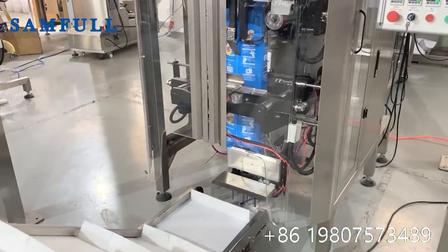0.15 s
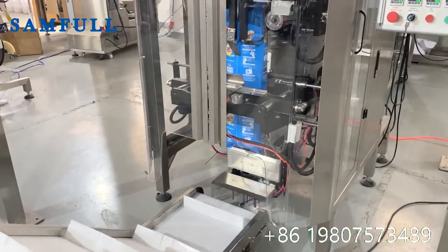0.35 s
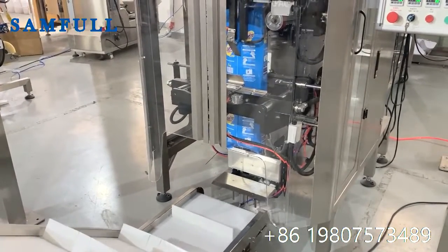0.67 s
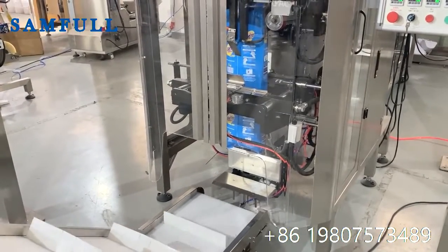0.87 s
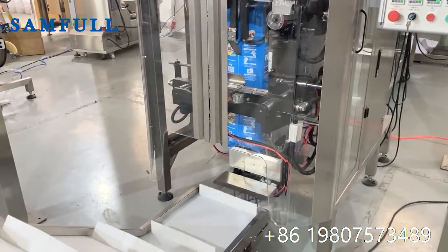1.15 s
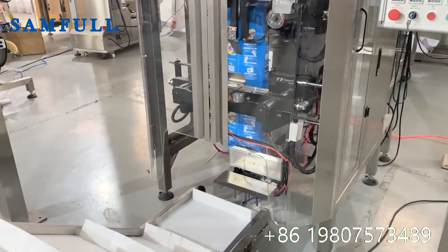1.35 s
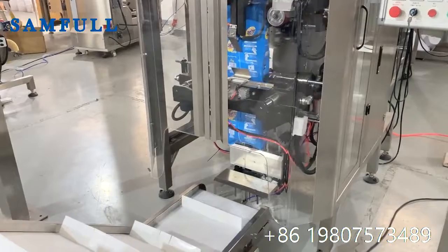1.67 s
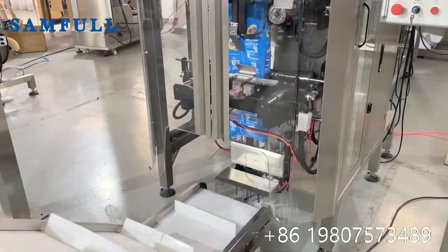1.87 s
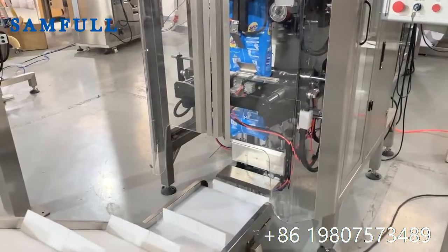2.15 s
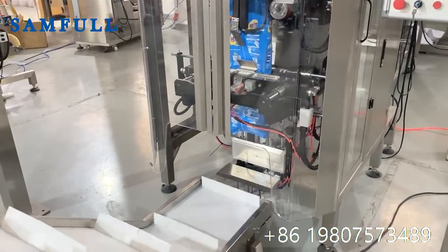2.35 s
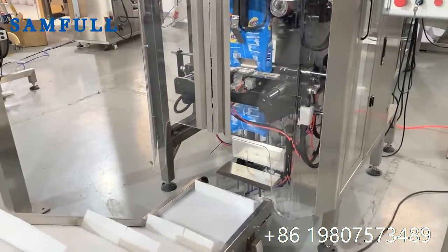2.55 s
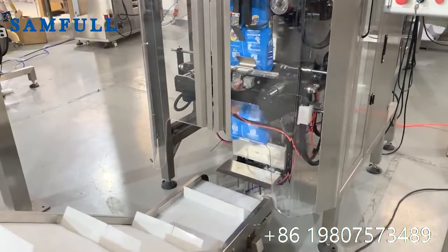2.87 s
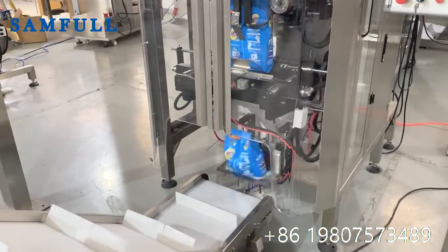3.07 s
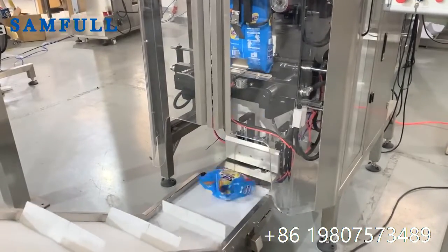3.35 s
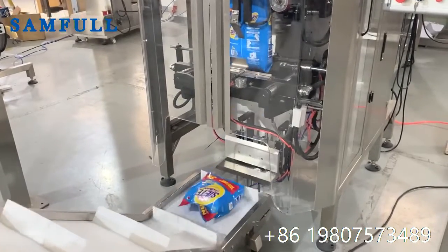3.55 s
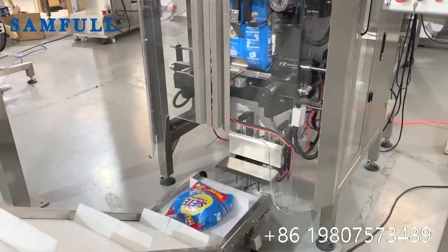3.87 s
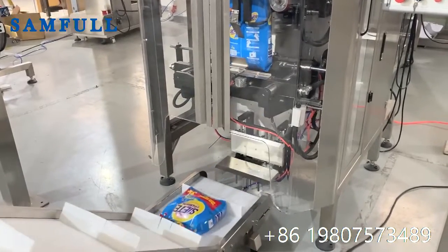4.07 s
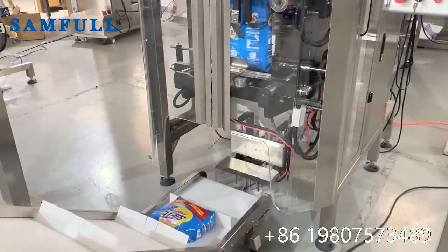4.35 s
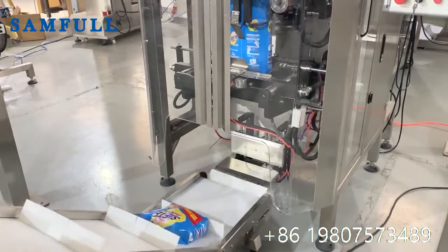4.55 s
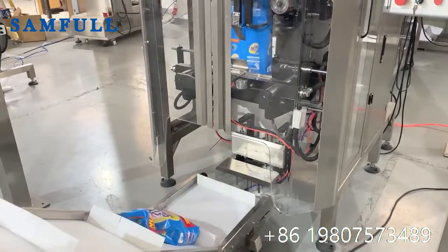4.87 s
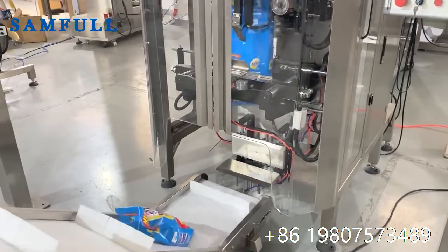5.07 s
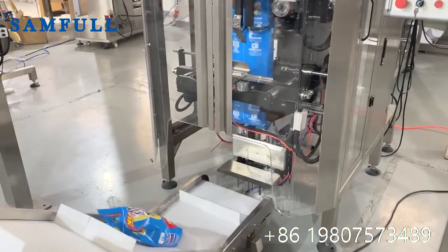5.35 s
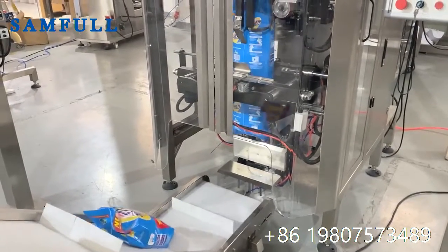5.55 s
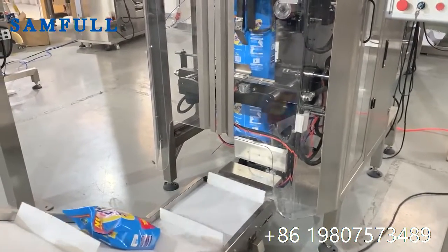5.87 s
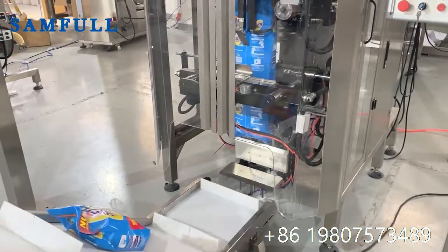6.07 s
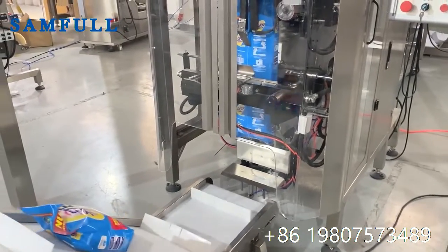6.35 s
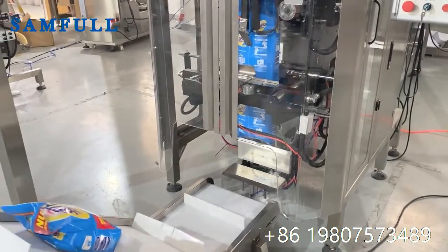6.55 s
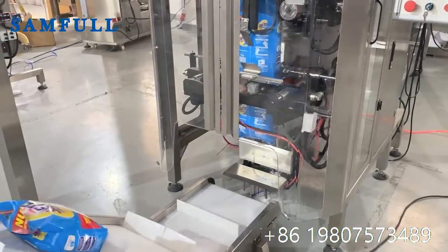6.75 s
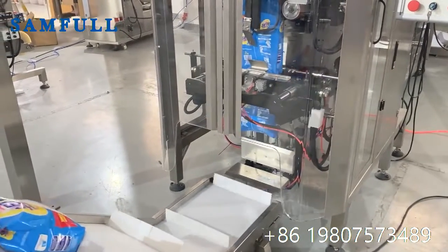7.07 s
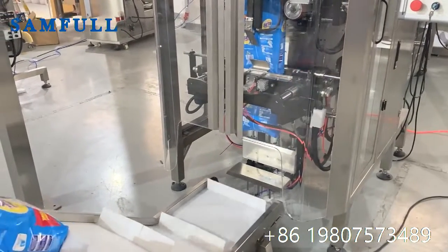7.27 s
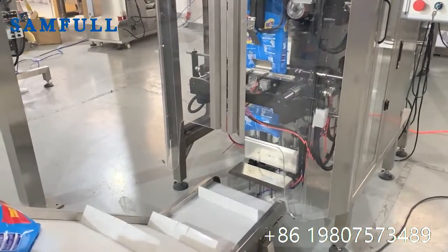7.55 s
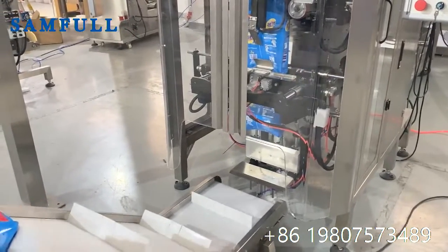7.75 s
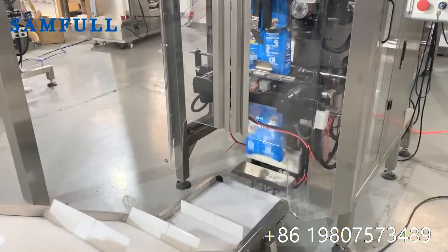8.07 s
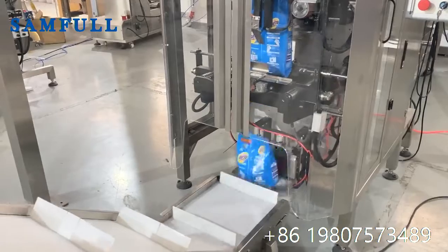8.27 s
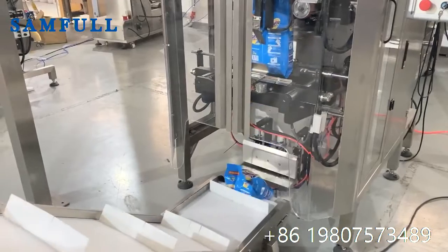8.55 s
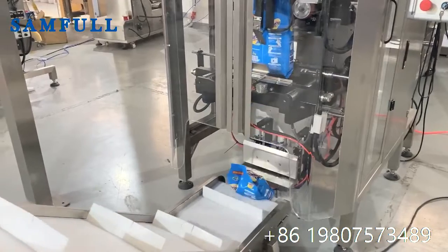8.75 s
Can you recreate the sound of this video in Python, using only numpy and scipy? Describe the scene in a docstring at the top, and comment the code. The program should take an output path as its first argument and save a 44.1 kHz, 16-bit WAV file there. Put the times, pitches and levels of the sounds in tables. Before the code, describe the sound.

A bagging machine cycles over motor hum: long bright air hisses, heavy thumps, sharp metallic clinks, and filled plastic bags slapping down onto a conveyor.

```python
"""A bagging machine works into its second cycle on a hard factory floor, heard by a two-port microphone.
Air cylinders vent and a jet blows: coloured noise, gated by valves. Jaws and bags knock, thump and clink,
and each bag slaps a steel flap and drops onto the conveyor: noise bursts and ringing modes. Film crinkles
in grains of noise. Behind it motors hum and an inverter whines as wavering and steady tones, over churning
drives and hall noise."""
import sys
import numpy as np
from scipy import signal
from scipy.fft import rfft, irfft
from scipy.io import wavfile

SR = 44100
rng = np.random.default_rng(int(sys.argv[2]) if len(sys.argv) > 2 else 0)


def unload_wav(signal):
    """Save mono or channel-first audio to the path in sys.argv[1] as 16-bit WAV at rate SR, clipped to [-1, 1]."""
    wavfile.write(
        sys.argv[1],
        SR,
        np.round(np.clip(np.atleast_2d(signal).T, -1, 1) * 32767).astype(np.int16),
    )


N = 393372
T = np.arange(N) / SR
HZ = np.fft.rfftfreq(N, 1 / SR)

# Levels are nominal: random flutter rides on many of them. Spectra set colour only, so theirs are relative.
# the machine repeats the same strokes for every bag; delays count from the start of a cycle
FIRST_CYCLE_S, CYCLE_S = 1.5, 5.1395

# cylinder strokes of a cycle [delay/s, length/s, level/dB, sag/(dB/s); a negative sag swells]
STROKES = [(0.026, 0.33, -29.5, 3), (0.526, 0.14, -37, 3), (1.215, .1, -32.5, -10), (1.349, 0.92, -27.5, 6)]
VALVE_OPEN_S, VENT_T60_S = 0.03, 1
# colour of the cylinder exhaust [f/Hz, relative level/dB per Hz]
VENT = [(400, 6), (900, 5.5), (1800, 3), (2350, 4), (2850, 3.5), (3300, -0.5), (4200, 1.5), (5050, 7.5),
        (6400, -2.5), (7300, 4), (9000, -10), (10900, 0), (12300, -6.5), (15000, -11)]
# the jet blows once a cycle and grows slightly; after it shuts, the hall rings on
JET_DELAY_S, JET_LENGTH_S, JET_DB, JET_GROWTH_DB_PER_S = 1.337, 0.98, -27, 3.5
JET_OPEN_S, JET_T60_S = 0.023, 0.3
# colour of the jet: a broad rush, humped by nozzle and surroundings [f/Hz, relative level/dB per Hz]
JET = [(700, -22), (2100, -7), (2700, -9), (3450, -2.5), (3900, -5.5), (4500, 2.5), (4780, 0), (5950, 2.5),
       (6300, -3), (7000, 0), (7750, -7), (8550, 0), (9150, -7), (10250, -.5), (10800, -5), (11600, .5),
       (12200, -2), (12800, 2.5), (13300, -1.5), (13800, -.5), (14700, -7), (15600, -6)]

# jaws, linkage and dropping or sliding bags knocking on frame and chute [t/s, level/dB, ring t60/s]
KNOCKS = [(1.856, -32, 0.16), (1.936, -22.5, 0.14), (2.06, -23, .15), (2.085, -27, 0.25),
          (2.138, -30, 0.22), (2.182, -26, 0.18), (2.85, -26.5, 0.37), (3.067, -25, 0.2), (3.102, -26, 0.3),
          (3.18, -22, 0.3), (3.212, -26, 0.19), (3.342, -23, 0.18), (5.5, -35, 0.6), (6.997, -25, 0.18),
          (7.072, -23.5, 0.14), (7.211, -23, 0.17), (7.278, -28, 0.41), (7.99, -25, 0.15),
          (8.322, -21, 0.52), (8.5, -27, .3)]
KNOCK_RISE_S = 0.013
# resonances of the steel frame and chute [f/Hz, width/Hz, relative level/dB]
FRAME = [(450, 140, 7), (805, 240, 4), (1120, 210, -3), (1430, 420, 1.5), (2160, 420, -5),
         (3750, 1800, -17), (5840, 850, -15)]
# moving jaws rocking the whole machine in each cycle [delay/s, level/dB, build-up/s]
THUMPS = [(.087, -17, 0.016), (0.436, -20.5, 0.026), (.572, -21, 0.0097), (.645, -22.5, .02),
          (1.64, -18, 0.021), (1.684, -20.5, .028), (1.84, -20, 0.014), (3.994, -28, .018)]
# jaw carriage moves of a cycle, rattling the frame and loading the drives [delay/s, length/s]
TRAVELS = [(0.133, 0.42), (0.552, 0.274)]
TRAVEL_RATTLE_DB, TRAVEL_CHURN_DB = -34, -32
# bags landing on the conveyor [t/s, clatter level/dB, dull body level/dB]
LANDINGS = [(3.44, -28, -35), (8.689, -17, -20.5)]
LANDING_RISE_S, LANDING_T60_S, BODY_T60_S = 0.024, 0.16, 0.36
# heavy jaw bars clunking dully as they start and stop [t/s, level/dB]
CLUNKS = [(2.08, -27), (7.075, -23), (7.212, -21.5)]

# the falling bag slapping the sheet-steel drop flap [t/s, level/dB]
SLAPS = [(3.159, -22), (3.176, -23.5), (8.299, -21.5), (8.318, -21), (8.338, -25)]
# modes of the flap [f/Hz, relative level/dB, t60/s]
FLAP = [(888, -10, .16), (1087, 0, .2), (1172, -1.5, .18), (1324, -10, .16), (1480, -8, .16),
        (2450, -12, .22), (2670, -14, .14)]
# the chute squeaking and ringing as the bag slides off and lands [t/s, f/Hz, level/dB]
CHUTE = [(3.104, 2290, -31), (3.44, 446, -25), (8.206, 2100, -34), (8.258, 2073, -29), (8.69, 525, -26.5)]
# metal stops meeting [t/s, contact level/dB, ringing level/dB]
CLINKS = [(1.971, -22.5, -40), (2.1662, -12, -16.5), (4.178, -32, -42), (7.1757, -29, -34),
          (7.219, -31, -38), (7.306, -12.5, -16.5)]
# resonances of the stops [f/Hz, width/Hz, relative level/dB]
STOP = [(6000, 260, 6), (6600, 240, 4), (7900, 300, 0), (10600, 600, -6.5), (11500, 800, -6)]
# colour of the hard contact [f/Hz, relative level/dB per Hz]
TICK = [(3000, -16), (4800, -6), (6300, -1), (9000, -15), (10800, 11), (12500, -23), (15000, 0)]

# film sliding over the forming collar, above a faint constant rustle [start t/s, end t/s, level/dB]
PULLS = [(.55, 1.345, -49), (4.22, 6.652, -46)]
RUSTLE_DB, PULL_RAMP_S = -48.5, 0.073
# film catching and slipping in even, fading runs [start t/s, end t/s, first slip level/dB, gap/s]
SLIP_RUNS = [(0.62, .93, -48, .056), (5.482, 5.93, -36.5, 0.071)]
SLIP_FADE_DB_PER_S, CREASE_T60_S = 26, 0.35
# single loud creases of the film and of falling bags [t/s, level/dB]
CREASES = [(1.01, -36.5), (2.58, -37), (3.07, -25.5), (3.175, -21.5), (4.17, -42), (4.28, -42),
           (4.89, -36.5), (5.3, -39), (6.25, -37.5), (7.69, -37), (8.32, -20.5), (8.688, -20)]
# tiny crackles between the louder creases; the level is that of the smallest
CRACKLES_PER_S, CRACKLE_DB, CRACKLE_T60_S = 10, -47.5, 0.042
# colour of the rustling film [f/Hz, relative level/dB per Hz]
FILM = [(500, -1), (2000, 9), (4800, 13), (7000, 8), (11000, 5), (15000, 2)]

# inverter carrier and its sidebands [f/Hz, level/dB]
WHINE = [(7842, -59.5), (7960, -51), (7990, -59), (8020, -48), (8080, -61)]
# servo moves [start t/s, end t/s, f/Hz, level/dB]
SERVOS = [(2.62, 2.86, 300, -23.5), (2.9, 3.06, 302, -23.5), (4.64, 4.92, 300, -22.7),
          (4.95, 5.13, 300, -26.5), (4.62, 4.92, 150, -28), (5.0, 5.56, 69, -24.5), (5.52, 6.0, 68, -28.5)]
# mains hum [t/s, level/dB]
HUM_50 = [(0.0, -29), (0.7, -44), (1.5, -46), (1.87, -32), (4.81, -31.5), (8.6, -30.5)]
# octave of the mains hum [t/s, level/dB]
HUM_100 = [(0.1, -23.5), (0.7, -25.5), (1.7, -29.5), (2.15, -23.5), (2.6, -32), (3.1, -38), (3.55, -32),
           (3.9, -44), (4.7, -32.5), (5.4, -29), (5.8, -47), (6.1, -27.5), (6.5, -34), (7.7, -34),
           (8.15, -25.5), (8.9, -37)]
# steady overtones of the motors [f/Hz, level/dB]
OVERTONES = [(150, -36), (249.7, -36.8), (300, -40), (731, -57)]

# surges of the drives, about one a second, building quickly and easing off slowly [t/s, level/dB]
SURGES = [(.64, -24.5), (1.6, -26), (2.55, -27), (3.48, -27.5), (4.5, -27), (4.92, -26), (5.46, -24),
          (6.35, -24), (6.8, -27.5), (7.36, -27), (8.2, -26)]
CHURN_DB, SURGE_RISE_S, SURGE_T60_S = -36, 0.2, 2.6
# colour of the churning drives [f/Hz, relative level/dB per Hz]
DRIVES = [(30, -41), (140, -3.0), (260, -0.5), (400, -1.5), (650, -11.5), (1200, -16.5),
          (3000, -32.0), (9000, -55)]
# colour of the running noise of machine and hall [f/Hz, relative level/dB per Hz]
HALL = [(25, -27), (38, -10), (65, 2.5), (125, -1.5), (200, -2.5), (380, -4.5), (680, -15.5), (920, -13),
        (1100, -16), (1750, -19.5), (2600, -26.5), (4800, -26), (7000, -34), (10500, -48), (15000, -50)]

# likeness of the sound at the two microphone ports [f/Hz, likeness 0-1]
PORT_LIKENESS = [(60, .99), (200, .93), (400, .82), (750, .38), (2500, .33), (4500, .3), (6300, .6),
                 (7800, .55), (8600, .9), (9200, .99), (10600, .55), (12200, .96), (13700, .65),
                 (15000, .98)]
# how late the shared sound reaches the left port [f/Hz, lag/ms]
PORT_LAG = [(1000, .045), (3500, .06), (4700, .09), (5500, .125), (6300, .163)]
# balance of the ports [f/Hz, left minus right level/dB]
PORT_BALANCE = [(330, .9), (520, -1.2), (1100, -1.1), (2200, -.3), (8000, .1)]
EDGE_HZ = 15750


def pneumatics():
    """Cylinders vent through a silencer; the bare jet is a broad rush of shifting colour."""
    strokes = [amp(db) * valve(delay, length, VALVE_OPEN_S, -sag, VENT_T60_S)
               for delay, length, db, sag in STROKES]
    exhaust = each_cycle(together(strokes))
    blast = valve(JET_DELAY_S, JET_LENGTH_S, JET_OPEN_S, JET_GROWTH_DB_PER_S, JET_T60_S)
    blast = each_cycle(amp(JET_DB) * blast)
    vent = wandering(air(amp(read(VENT))), depth_db=2.5) * exhaust * amp(1.0 * drift(20))
    jet = wandering(air(amp(read(JET))), depth_db=2.5) * blast * amp(.5 * drift(35))
    return vent + jet


def valve(start, length, opening, slope_db, t60):
    """Air flow: the valve opens, the level slopes while it is held, and the hiss dies away after it shuts."""
    held = np.clip(T - start, 0, length)
    opened = np.clip((T - start) / opening, 0, 1)
    dying = np.exp(-np.log(1000) * np.maximum(T - start - length, 0) / t60)
    return opened * amp(slope_db * held) * dying


def knocks(thump_hz=67, thump_t60=0.15, chatter_db=2.0):
    """Jaws, linkage, carriage and bags excite frame and chute with chattering noise; heavy moves thump low."""
    blows = [amp(db) * blow(s, KNOCK_RISE_S, t60) for s, db, t60 in KNOCKS]
    bags = [amp(db) * blow(s, LANDING_RISE_S, LANDING_T60_S) for s, db, _ in LANDINGS]
    clatter = together([amp(TRAVEL_RATTLE_DB) * travel()] + blows + bags)
    chatter = evened(amp(chatter_db * drift(95)))
    frame = wandering(air(resonances(FRAME)), depth_db=2.5)
    thump = sum(amp(db) * blow(s, rise, thump_t60) * np.sqrt(2) * np.sin(2 * np.pi * thump_hz * (T - s))
                for s, db, rise in THUMPS)
    return frame * clatter * chatter + each_cycle(thump)


def travel(ramp=0.056):
    """On while the jaw carriage moves."""
    return each_cycle(sum(during(delay, delay + length, ramp) for delay, length in TRAVELS))


def struck(hits, modes, rise=0.003, uneven_db=1.5, detune=0.0095):
    """Each hit lands on another spot of a steel part and rings its modes in a new mix."""
    out, t = np.zeros((2, N)), T[:SR // 2]
    for s, db in hits:
        at = round(s * SR)
        for hz, mode_db, t60 in modes:
            strength, shift, phase, port = rng.standard_normal(4)
            turns = hz * (1 + detune * shift) * t + phase
            # opposite phase shifts spread the mode over the two ports
            wave = np.sin(2 * np.pi * turns + port * np.array([[1], [-1]]))
            gain = amp(db + mode_db + uneven_db * strength)
            ring = np.minimum(t / rise, 1) * np.exp(-np.log(1000) * t / t60)
            out[:, at:at + len(t)] += gain * ring * wave
    return out


def chute(rise=0.016, t60=0.27, spread=0.12):
    """The thin plate rings on one mode, roughened by the sliding bag."""
    return sum(amp(db) * blow(s, rise, t60) * tone(hz, waver=1.0, rate=spread * hz) for s, hz, db in CHUTE)


def clinks():
    """A hard, dry contact; the stop rings briefly and the panels scatter it."""
    contact = sum(amp(db) * blow(s, .0006, .007) for s, db, _ in CLINKS)
    ring = 0
    for s, _, db in CLINKS:
        direct = blow(s + 0.0012, 0.00032, 0.02)
        scattered = amp(-11.5) * blow(s + 0.0079, 0.00088, 0.15)
        ring = ring + amp(db) * (direct + scattered)
    return air(amp(read(TICK))) * contact + air(resonances(STOP)) * ring


def film(grain_db=1.5):
    """Plastic film rustles in clumped grains as it is pulled, with runs of slips and louder creases."""
    pulls = [amp(db) * during(start, end, PULL_RAMP_S) for start, end, db in PULLS]
    slide = together([amp(RUSTLE_DB)] + pulls) * amp(3.5 * drift(21))
    slips = [(s, db - SLIP_FADE_DB_PER_S * (s - start))
             for start, end, db, gap in SLIP_RUNS for s in np.arange(start, end, gap)]
    creases = sum(amp(db) * blow(s, 0.0099, CREASE_T60_S) for s, db in CREASES + slips)
    grains = evened(amp(grain_db * drift(350)))
    return air(amp(read(FILM))) * together([slide, creases, crackles()]) * grains


def crackles(spread_db=3):
    """Envelope of tiny snaps at random moments, a few larger than the rest."""
    size_db = CRACKLE_DB + spread_db * np.minimum(rng.exponential(1, N), 3)
    snaps = (rng.random(N) < CRACKLES_PER_S / SR) * amp(size_db)
    return signal.lfilter([1], [1, -np.exp(-np.log(1000) / (CRACKLE_T60_S * SR))], snaps)


def whistle(db=-56):
    """A thin, fuzzy whistle, narrow-band noise, late in the longer film pull."""
    return amp(db) * during(5.33, 6.27, .08) * air(np.exp(-((HZ - 13430) / 170) ** 2))


def inverter(skirt_db=-53):
    """Switching lines beat against each other over a fuzzy skirt; each port hears its own phase."""
    port_turns = np.array([[0], [.3]])
    lines = sum(amp(db) * np.sqrt(2) * np.cos(2 * np.pi * (hz * T + rng.random() + port_turns))
                for hz, db in WHINE)
    skirt = air(np.exp(-((HZ - 8020) / 260) ** 2))
    return lines + amp(skirt_db) * skirt


def motors(hum_waver=0.04, mains_waver=0.03):
    """Mains hum with overtones, and servos that sing while they move."""
    hum = amp(curve(HUM_50)) * tone(50, waver=mains_waver, rate=3)
    hum += amp(curve(HUM_100)) * tone(99.9, waver=hum_waver, rate=4)
    hum += sum(amp(db) * tone(hz, waver=.2, rate=2) for hz, db in OVERTONES)
    servos = sum(amp(db) * during(start, end, .05) * tone(hz, waver=.15, rate=10)
                 for start, end, hz, db in SERVOS)
    return hum + servos


def running():
    """Steady hall noise, and the churn of the drives swelling in the low middle."""
    hall = amp(-26.5) * air(amp(read(HALL))) * amp(1.5 * drift(25))
    drives = wandering(air(amp(read(DRIVES))), depth_db=2.0)
    return hall + drives * churn() * amp(1.34 * drift(13))


def churn():
    """Effort of the drives: a steady part, surges, the moving carriage, its clunks and landing bags."""
    surges = [amp(db) * blow(s, SURGE_RISE_S, SURGE_T60_S) for s, db in SURGES]
    clunks = [amp(db) * blow(s, KNOCK_RISE_S, BODY_T60_S) for s, db in CLUNKS]
    bags = [amp(db) * blow(s, LANDING_RISE_S, BODY_T60_S) for s, _, db in LANDINGS]
    return together([amp(CHURN_DB), amp(TRAVEL_CHURN_DB) * travel()] + surges + clunks + bags)


def air(colour, glance_db=-13, count=8):
    """Coloured noise at both ports: a shared part that reaches the left one late, and a diffuse part."""
    shared, diffuse = rfft(rng.standard_normal((2, N)))
    same = np.clip(read(PORT_LIKENESS), 0, 1)
    late = np.exp(-2j * np.pi * HZ * read(PORT_LAG) / 1000)
    # reflections off nearby steel panels comb the sound with fixed ripples
    echoes = np.zeros(N)
    delays = rng.integers(SR // 200, SR // 40, count)
    echoes[delays] = amp(glance_db) * rng.choice([-1, 1], count) / np.sqrt(count)
    ports = np.array([shared * late, same * shared + np.sqrt(1 - same ** 2) * diffuse])
    ports = ports * amp(read(PORT_BALANCE) * np.array([[.5], [-.5]]))
    return evened(irfft(ports * colour * (1 + rfft(echoes)), N))


def wandering(x, depth_db, size=(5, 45)):
    """The colour keeps shifting: narrow humps come and go in random patches of time and frequency."""
    z = signal.stft(x, nperseg=1024, noverlap=768)[2]
    patch = np.outer(*map(np.hanning, size))
    patches = evened(signal.fftconvolve(rng.standard_normal(z.shape[1:]), patch, "same"))
    shifted = signal.istft(z * amp(depth_db * patches), nperseg=1024, noverlap=768)[1]
    return evened(shifted[:, :N])


def tone(hz, waver, rate):
    """A line of rms near 1 whose strength and phase waver."""
    wobble = 1 + waver * (drift(rate) + 1j * drift(rate))
    line = np.real(wobble * np.exp(2j * np.pi * (hz * T + rng.random())))
    return np.sqrt(2) * line / np.sqrt(1 + 2 * waver ** 2)


def resonances(modes):
    """Gain of a set of broad resonances, rolled off under half the first one's frequency."""
    power = sum(amp(db) ** 2 / (1 + (2 * (HZ - hz) / width) ** 2) for hz, width, db in modes)
    return np.sqrt(power) * HZ ** 2 / (HZ ** 2 + (.5 * modes[0][0]) ** 2)


def drift(rate, size=32768):
    """Slow chance of rms 1, up to about rate changes a second."""
    hz = np.fft.rfftfreq(size, T[-1] / size)
    slow = irfft(rfft(rng.standard_normal(size)) * np.exp(-(hz / rate) ** 2) * (hz > 0))
    return evened(np.interp(T, np.linspace(0, T[-1], size), slow))


def blow(s, rise, t60):
    """Envelope that builds up to time s and dies away."""
    return np.exp(np.minimum((T - s) / rise, (s - T) * np.log(1000) / t60))


def during(start, end, ramp):
    """Envelope that is on from start to end, with sloping edges."""
    return np.clip(np.minimum(T - start, end - T) / ramp, 0, 1)


def each_cycle(x):
    """Plays one cycle's sound or envelope again for every bag."""
    return sum(np.interp(T - start, T, x, left=0) for start in np.arange(FIRST_CYCLE_S, T[-1], CYCLE_S))


def together(envelopes):
    """Unrelated noises add in power."""
    return np.sqrt(sum(e ** 2 for e in envelopes))


def curve(rows):
    """A time table, at every sample."""
    return np.interp(T, *np.transpose(rows))


def read(points):
    """A spectrum table on every frequency bin, interpolated over log frequency."""
    hz, value = np.transpose(points)
    return np.interp(np.log(HZ + 1), np.log(hz + 1), value)


def evened(x):
    """Scales to rms 1."""
    return x / np.sqrt(np.mean(x ** 2) + 1e-20)


def amp(db):
    """Decibels to gain."""
    return 10 ** (np.asarray(db) / 20)


def scene():
    """All sources together; the motors lean slightly to the left."""
    machine = pneumatics() + knocks() + struck(SLAPS, FLAP) + chute() + clinks() + film() + whistle()
    hum = motors() * amp(np.array([[.3], [-.3]]))
    return machine + inverter() + hum + running()


def record(dry):
    """The recorder's band limit: a steep low-pass at EDGE_HZ."""
    lowpass = signal.firwin(511, EDGE_HZ, window=("kaiser", 9), fs=SR)
    return signal.oaconvolve(dry, lowpass[None], "same")


dry = scene()
out = record(dry)
unload_wav(out)
```